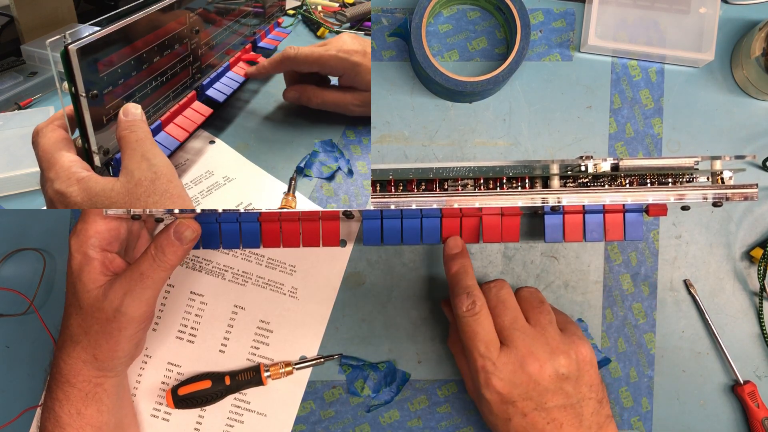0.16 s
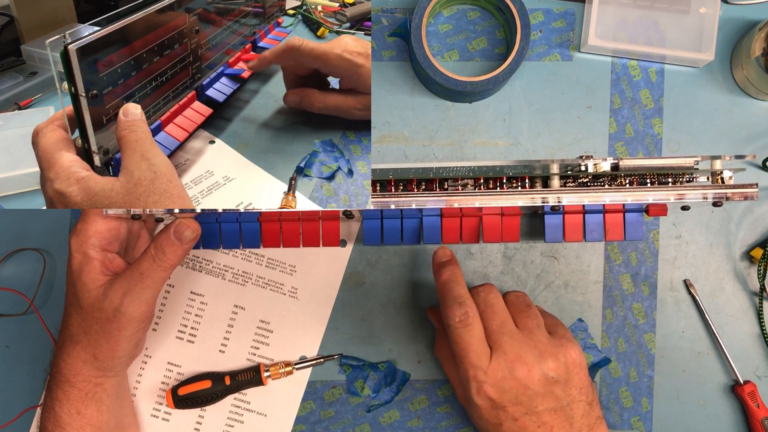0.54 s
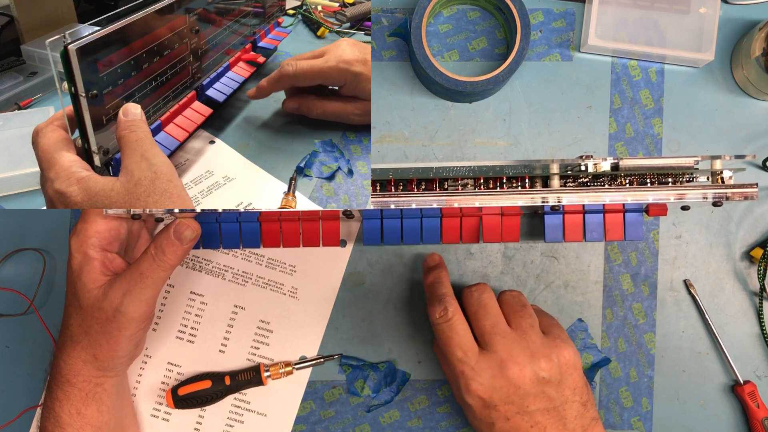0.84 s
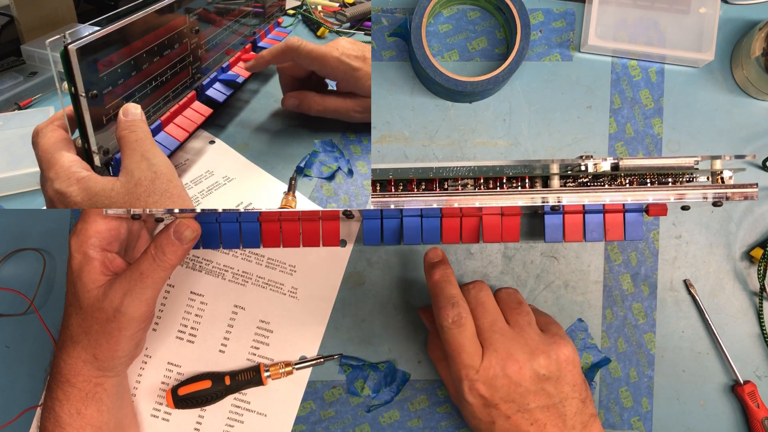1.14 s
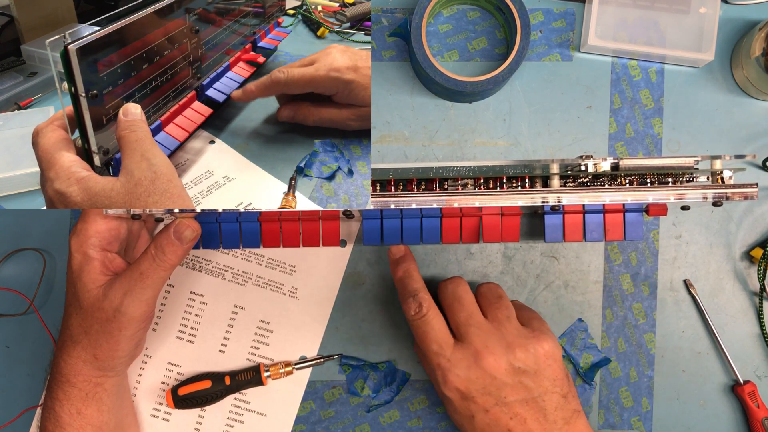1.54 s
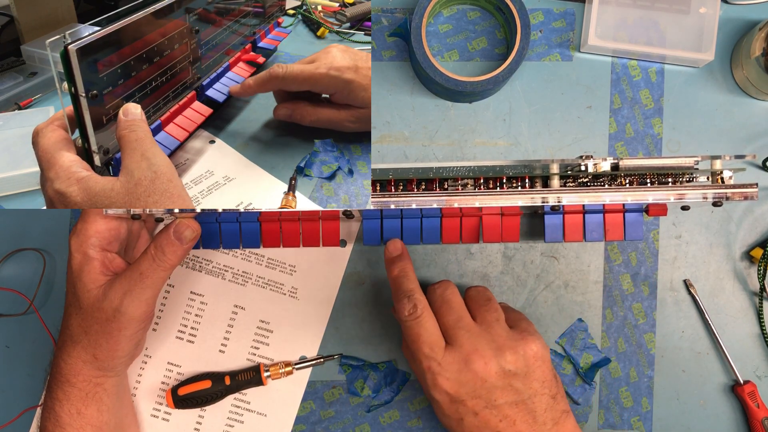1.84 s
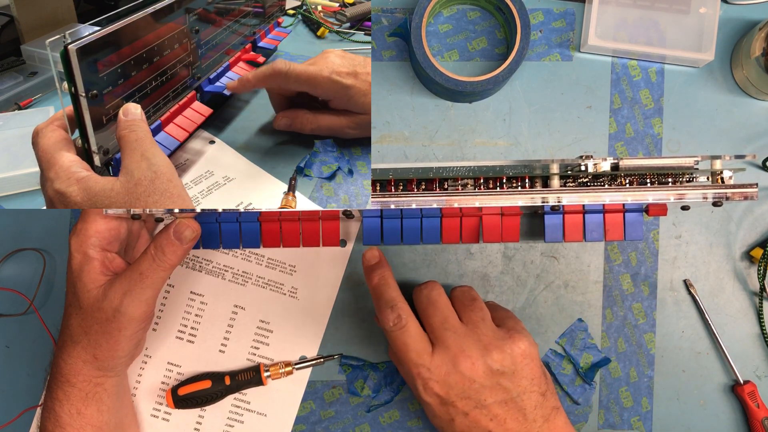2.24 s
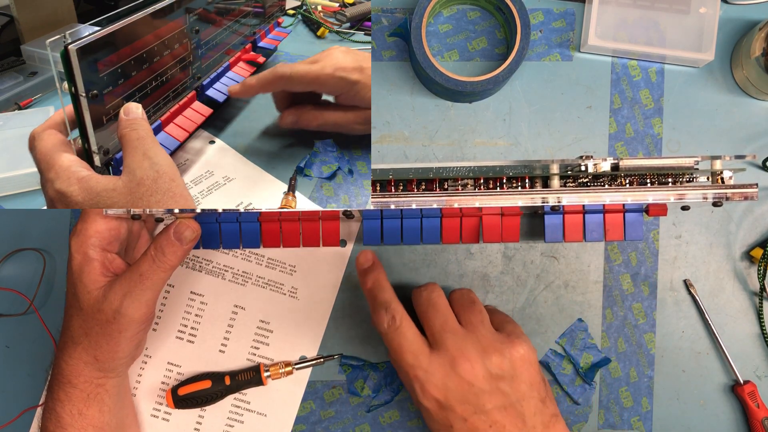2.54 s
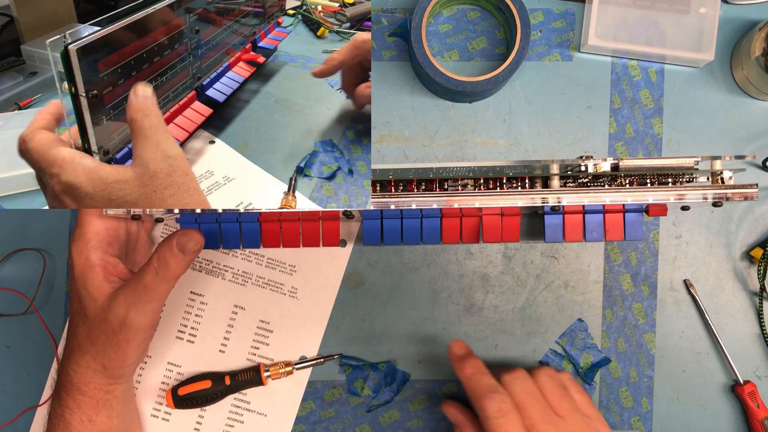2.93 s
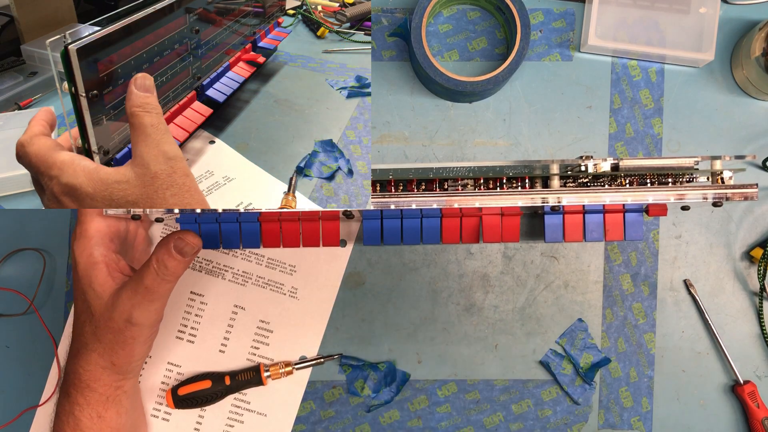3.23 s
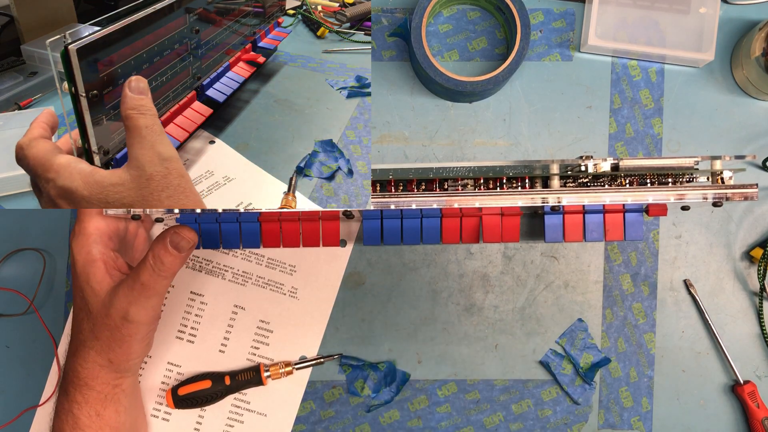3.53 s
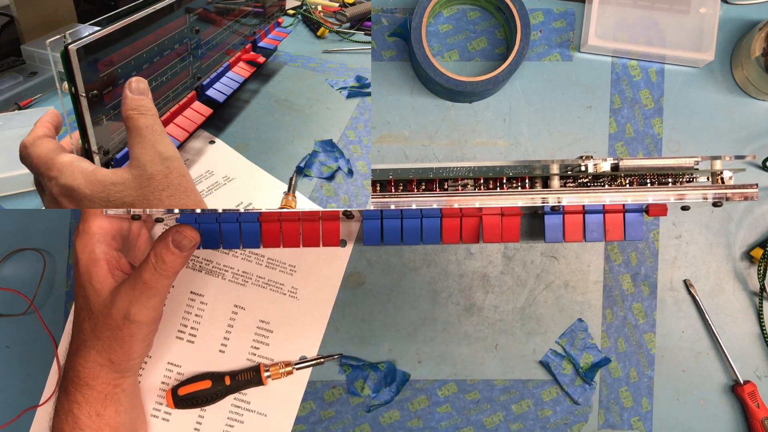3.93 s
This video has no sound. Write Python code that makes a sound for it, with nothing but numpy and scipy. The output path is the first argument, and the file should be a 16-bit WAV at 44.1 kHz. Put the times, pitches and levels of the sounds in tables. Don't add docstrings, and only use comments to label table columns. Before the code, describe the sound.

A close, dry indoor sound at a workbench over a quiet, low hum of air. Nine plastic paddle switches are flicked in turn, at about 0.18, 0.52, 0.77, 1.08, 1.36, 1.65, 1.90, 2.20 and 2.48 seconds. Each flick begins with a light fingertip tick, often slightly ahead, and a tiny scrape of the lever; then a bright metallic-plastic snap of the spring contact and, two to eight milliseconds later, a hard clack of the paddle on its stop. Hollow plastic resonance around one to two kilohertz and a soft low thump of the held board lie underneath. Pitches and strengths vary a little; a faint springy ring and a short small-room tail fade quickly. After 2.5 seconds the clicking ends. The hum continues, with very faint skin and sleeve hiss, swelling into soft rustles from about 3.3 to 4 seconds and a faint bump near 3.64.

```python
import sys
import numpy as np
from scipy import signal
from scipy.io import wavfile
from scipy.ndimage import uniform_filter1d, minimum_filter1d

SR = 44100
rng = np.random.default_rng(int(sys.argv[2]) if len(sys.argv) > 2 else 0)


def int16_out(signal):
    q = np.round(np.clip(np.atleast_2d(signal).T, -1, 1) * 32767)
    wavfile.write(sys.argv[1], SR, q.astype(np.int16))


def nominal_scale(level):
    x = np.asarray(level, float) / 20
    return 10 ** x


N = 179707

# frequency in Hz, T60 in seconds.
ROOM_DECAY = [(300, 0.14), (1200, 0.13), (3000, 0.17), (7000, 0.17), (14000, 0.14)]
# start in seconds, nail tick in dB, finger weight in dB, paddle pitch in Hz.
FINGER_TOUCHES = [(0.1585, -35.5, -41.5, 1460), (.262, -53, -50, 1010), (0.269, -62, -54, 1010),
                  (0.454, -38.5, -37.5, 1420), (0.728, -57, -55, 1690), (0.7312, -53.5, -48.5, 1670),
                  (1.0323, -37, -41.5, 1960), (1.318, -58, -65, 1640), (1.3261, -50.5, -50, 1650),
                  (1.5988, -40.5, -47.5, 1120), (1.857, -62, -64, 1530), (2.1526, -36, -43.5, 1680),
                  (2.4535, -50.5, -62, 1620)]


def evened(x):
    return x / np.sqrt(np.mean(x ** 2) + 1e-20)


def read(points, hz):
    f, value = np.transpose(points)
    return np.interp(np.log(hz + 1), np.log(f + 1), value)


def add(mix, s, sound):
    part = mix[round(s * SR):][:len(sound)]
    part += sound[:len(part)]


def coloured(points, size, patchy_db, flicker_db):
    frames = N * 4 // size + 8
    hz = np.fft.rfftfreq(size, 1 / SR)
    a, b, patches = rng.standard_normal((frames, len(hz), 3)).T
    patches = uniform_filter1d(patches, size=12, axis=0)
    patches = evened(uniform_filter1d(patches, size=8, axis=1))
    flicker = evened(uniform_filter1d(rng.standard_normal(frames), size=3))
    level_db = read(points, hz)[:, None] + patchy_db * patches + flicker_db * flicker
    noise = signal.istft((a + 1j * b) * nominal_scale(level_db), nperseg=size, noverlap=size * 3 // 4)[1]
    return evened(noise[:N])


def ring(modes, chance):
    spread_db, detune = 2, 0.01
    t = np.arange(round(0.3 * SR)) / SR
    out = np.zeros(len(t))
    for k, ((hz, db, t60), (a, b)) in enumerate(zip(modes, chance)):
        decay = nominal_scale(db + spread_db * a - 60 * t / t60)
        out += (-1) ** k * decay * np.sin(2 * np.pi * hz * (1 + detune * b) * t)
    return out


def near(modes, centre_hz, db_per_octave):
    return [(hz, db - db_per_octave * abs(np.log2(hz / centre_hz)), t60) for hz, db, t60 in modes]


def air():
    # frequency in Hz, density in dB per Hz.
    air_colour = [(56, -27.5), (95, 0.5), (152, 1.5), (177, -9), (303, -2.5), (359, -12), (408, -4),
                  (455, -15.5), (655, -12.5), (963, -13.5), (1450, -17.5), (1850, -29.5), (7550, -37.5),
                  (10600, -37.5), (16000, -41)]
    return nominal_scale(-54.5) * coloured(air_colour, size=2048, patchy_db=1.23, flicker_db=0.5)


def rumble():
    # frequency in Hz, density in dB per Hz.
    rumble_colour = [(2.4, -24.5), (4.0, 6.5), (17, -7.5), (38, -21.5), (59, -9), (75, -33), (100, -23),
                     (130, -46), (220, -120)]
    return nominal_scale(-40.5) * coloured(rumble_colour, size=8192, patchy_db=-0.5, flicker_db=0.0)


def sleeve():
    # frequency in Hz, density in dB per Hz.
    cloth = [(350, -61), (600, -15), (800, 1.5), (970, -20.5), (1100, -22), (1440, -10), (3980, -14.5),
             (10100, -10), (13900, -14.5), (15900, -19)]
    folds = [(500, -34), (800, -0.5), (1300, -12), (2000, -11.5), (2460, -5.5), (3000, -10.5), (4300, -15),
             (7000, -18)]
    # middle in seconds, length in seconds, level in dB, heavy folds in dB.
    strokes = [(.022, 0.063, -67, 2), (0.265, 0.032, -57.5, -1), (0.4, 0.054, -67, -14),
               (1.535, 0.044, -68.5, -11.5), (1.591, 0.035, -65.5, -9), (2.87, 0.68, -68, -38),
               (3.346, 0.23, -61, -5), (3.46, 0.19, -55.5, -29), (3.65, 0.23, -56, -18),
               (3.787, 0.12, -55, -5.5), (3.883, 0.22, -59.5, -19), (4.03, 0.31, -53.5, -1)]
    stroke_end_db = -12
    t = np.arange(N) / SR
    middle, length, db, folds_db = np.transpose(strokes)[:, :, None]
    power = nominal_scale(db + stroke_end_db * (2 * (t - middle) / length) ** 2) ** 2
    hiss_level = np.sqrt(power.sum(axis=0))
    rub_level = np.sqrt((power * nominal_scale(folds_db) ** 2).sum(axis=0))
    hiss = hiss_level * coloured(cloth, size=256, patchy_db=1.5, flicker_db=0)
    rub = rub_level * coloured(folds, size=512, patchy_db=2.5, flicker_db=-0.5)
    return hiss + rub


def creep():
    # frequency in Hz, level in dB, T60 in seconds.
    cam = [(3900, 5, 0.0024), (5020, -1.5, 0.004), (6460, -1, 0.0043), (8500, -0.5, 0.0023),
           (12000, 1, .0012)]
    # let-go in seconds, drag in dB, last slip in dB.
    presses = [
        (0.181, -52, -43),
        (.5215, -51.5, -48),
        (0.773, -59.5, -49),
        (1.077, -58, -37),
        (1.3538, -62, -47),
        (1.651, -52.5, -44),
        (1.898, -59, -42),
        (2.197, -58, -45),
        (2.478, -62, -59),
    ]
    creep_s, slip_s = 0.03, 0.003
    drag_s = creep_s - slip_s
    level = np.zeros(N)
    t = np.arange(0, creep_s, 1 / SR)
    for s, drag_db, slip_db in presses:
        db = np.interp(t, [drag_s, creep_s], [drag_db, slip_db])
        add(level, s - creep_s, nominal_scale(db) * np.minimum(t / drag_s, 1))
    slips = rng.standard_normal(N) * nominal_scale(2.9 * rng.exponential(1, N))
    cam_ring = ring(cam, np.zeros((len(cam), 2)))[:600]
    return level * evened(signal.oaconvolve(slips, cam_ring)[:N])


def impacts():
    # start in seconds, crack in dB, crack pitch in Hz, housing in dB.
    snaps = [(0.1793, -20.5, 11800, -29), (0.5212, -38.5, 8000, -33.5), (0.5245, -23.5, 7800, -45),
             (.7734, -27, 12800, -38), (1.078, -30, 12110, -40), (1.0809, -21.5, 8300, -31.5),
             (1.3535, -39, 8820, -49), (1.356, -31, 9100, -37.5), (1.6501, -39, 7250, -45),
             (1.6541, -38, 8450, -34), (1.6567, -34, 8900, -33.5), (1.898, -35, 12110, -34),
             (1.9003, -19.5, 12000, -41), (2.195, -31, 10000, -45), (2.1978, -19.5, 9700, -28.5),
             (2.4786, -33.5, 11400, -38)]
    # start in seconds, crack in dB, crack pitch in Hz, blow in dB, paddle pitch in Hz.
    slams = [(.1816, -21, 10200, -27.5, 1160), (0.5287, -25, 10900, -31.5, 1634),
             (.7771, -24, 11800, -26.5, 1585), (1.086, -21.5, 6670, -28, 1740),
             (1.359, -21.5, 11800, -28, 1180), (1.3607, -45, 8100, -35, 1370),
             (1.6589, -25.5, 7200, -35, 1740), (1.903, -30.5, 10300, -28.5, 1255),
             (2.2033, -24.5, 8350, -35, 1620), (2.481, -26.5, 12500, -29.5, 1370),
             (2.4845, -23, 11100, -27, 1150)]
    touch_hz, touch_housing_db, snap_paddle_db, slam_housing_db = 7100, -2.5, -6, 1.5
    rows = []
    for s, db, weight_db, paddle_hz in FINGER_TOUCHES:
        rows.append((s, db, touch_hz, db + touch_housing_db, weight_db, paddle_hz))
    for s, db, hz, housing_db in snaps:
        paddle_hz = min(slams, key=lambda slam: abs(slam[0] - s))[-1]
        rows.append((s, db, hz, housing_db, housing_db + snap_paddle_db, paddle_hz))
    for s, db, hz, blow_db, paddle_hz in slams:
        rows.append((s, db, hz, blow_db + slam_housing_db, blow_db, paddle_hz))
    return rows


def chatter(chance, rise_s, fade_s, share, first_db):
    when, size = chance
    t = np.arange(1, len(size) + 1) / SR
    swarm = size * (0.11 + (when < share)) * (1 - np.exp(-t / rise_s)) * np.exp(-t / fade_s)
    firm_blow = nominal_scale(first_db) * (np.arange(len(t)) == round(rise_s * SR))
    return swarm / np.linalg.norm(swarm) + firm_blow


def strike(blows, modes, db, count):
    sound = signal.fftconvolve(blows, modes)
    return nominal_scale(db) * sound / np.sqrt(np.mean(sound[:count] ** 2))


def switches():
    # frequency in Hz, level in dB, T60 in seconds.
    contact_modes = [(5280, -11, 0.0026), (6750, -3.5, 0.0054), (7370, -2.5, 0.0019), (8140, -1.5, 0.0036),
                     (9540, -1, 0.0016), (11900, -2, 0.0027), (12790, -3.5, 0.0031), (14270, -1.5, 0.002),
                     (15860, -7.5, 0.00097)]
    spring_modes = [(3805, 3.5, 0.046), (4020, 3, 0.12), (5420, -7.5, 0.16), (6520, -1.5, 0.0706),
                    (7800, -2.5, 0.15), (8700, -9.5, 0.081), (9870, -15, 0.101), (11440, -6, 0.12)]
    housing_modes = [(2480, -3.5, 0.0049), (2830, -2.5, 0.0034), (3680, -6, 0.011), (4070, -4.5, 0.0037),
                     (4610, -2.5, 0.0051)]
    paddle_modes = [(767, -12, 0.069), (1010, -3, 0.026), (1180, -13, 0.13), (1350, 1.5, 0.015),
                    (1302, -17, 0.2), (1429, -20.5, 0.26), (1460, -8.5, 0.088), (1686, -2, 0.048),
                    (1780, -11, 0.05), (1960, -1.5, 0.022), (2115, -12, 0.1), (2580, -5.5, 0.0088)]
    spring_db = -23
    treble, body = np.zeros((2, N))
    rows = impacts()
    chance = rng.standard_normal((len(rows), 4, 13, 2))
    rebounds = rng.random((len(rows), 2, 900))
    for row, c, (when, size) in zip(rows, chance, rebounds):
        s, crack_db, crack_hz, knock_db, paddle_db, paddle_hz = row
        signed = 2 * size - 1
        quick = chatter((when, signed), 0.00013, 0.0033, 0.24, first_db=-8.5)
        slow = chatter((when[::-1], signed[::-1]), 0.00093, 0.0021, 0.088, first_db=3)
        crack = ring(near(contact_modes, crack_hz, 8.1), c[0])[:800]
        housing = ring(housing_modes, c[1])[:800]
        paddle = ring(near(paddle_modes + [(paddle_hz, -1.5, 0.05)], paddle_hz, 9.1), c[2])
        spring = ring(near(spring_modes, crack_hz, 3.8), c[3])
        add(treble, s, strike(quick, crack, crack_db - 3.0, count=150))
        add(treble, s, strike(quick, spring, crack_db + spring_db, count=300))
        add(treble, s + 0.00032, strike(quick, housing, knock_db - 3.5, count=180))
        add(body, s + 0.00057, strike(slow, paddle, paddle_db - 2.5, count=350))
    return treble, body


def board():
    # frequency in Hz, level in dB, T60 in seconds.
    board_modes = [(143.9, -2, 0.13), (205, -9, 0.086), (339, -8.5, 0.057), (409.5, -2.5, 0.024),
                   (520, -3.5, 0.076)]
    sag_modes = [(49.8, -9, 0.31), (66.4, 11.5, 0.11), (93.2, 4, 0.13)]
    # start in seconds, knock in dB, knock pitch in Hz, sag in dB.
    jolts = [(.181, -31, 143.6, -41), (.533, -38, 144, -52), (.774, -32.5, 142, -40.5),
             (1.086, -32, 215, -39), (1.358, -30, 143.2, -39.5), (1.659, -30.5, 211, -45),
             (1.905, -36.5, 141.4, -36.5), (2.202, -38.5, 143, -41.5), (2.484, -35.5, 126.5, -35.5),
             (3.638, -44, 213, -67), (3.733, -73, 128, -61)]
    press_db, press_hz, press_sag_db = 1, 135, -6
    presses = [(s, db + press_db, press_hz, db + press_sag_db) for s, _, db, _ in FINGER_TOUCHES]
    rows = jolts + presses
    out = np.zeros(N)
    short_push = np.hanning(round(0.0019 * SR))
    slow_push = np.hanning(round(0.0072 * SR))
    chance = rng.standard_normal((len(rows), 2, 6, 2))
    for (s, knock_db, hz, sag_db), c in zip(rows, chance):
        knock_modes = near(board_modes, hz, 2.4) + [(hz, 1.5, 0.07)]
        knock = signal.fftconvolve(short_push, ring(knock_modes, c[0]))
        sag = signal.fftconvolve(slow_push, ring(sag_modes, c[1]))
        add(out, s + 0.00378, nominal_scale(knock_db + 2.7) * knock / np.abs(knock).max())
        add(out, s + 0.00303, nominal_scale(sag_db + 1.5) * sag / np.abs(sag).max())
    return out


def scatter(x):
    hz, t, z = signal.stft(x, SR, nperseg=256, noverlap=192)
    power = uniform_filter1d(abs(z) ** 2, size=11, axis=0)
    keep = nominal_scale(-120 * (t[1] - t[0]) / read(ROOM_DECAY, hz))
    power = np.array([signal.lfilter([1 - r], [1, -r], p) for r, p in zip(keep, power)])
    a, b = rng.standard_normal((len(t), len(hz), 2)).T
    tail = signal.istft((a + 1j * b) * np.sqrt(abs(power)), SR, nperseg=256, noverlap=192)[1]
    return np.concatenate([np.zeros(190), tail])[:N]


def room(x):
    taps = np.zeros(SR // 2)
    at = np.arange(88, len(taps) - 12, 12)
    taps[at + rng.integers(0, 12, len(at))] = rng.choice([-1., 1.], len(at))
    hz, t, z = signal.stft(taps, SR, nperseg=128)
    decay = nominal_scale(-60 * t / read(ROOM_DECAY, hz)[:, None])
    tail = signal.istft(z * decay, SR, nperseg=128)[1]
    return signal.fftconvolve(x, tail / np.linalg.norm(tail))[:N]


def scene():
    treble, body = switches()
    thumps = board()
    tail = nominal_scale(-6.0) * scatter(treble) + nominal_scale(-6) * scatter(body)
    tail += room(nominal_scale(-17.5) * treble + nominal_scale(-14.5) * body + nominal_scale(-10.0) * thumps)
    background = air() + rumble() + sleeve()
    return (treble + body + thumps + creep() + tail + background)[None]


def roll_off(x):
    return signal.sosfilt(signal.butter(12, 16960, fs=SR, output="sos"), x)


def record(dry):
    band_limit = signal.firwin(301, 15750, window=("kaiser", 8), fs=SR)
    x = signal.oaconvolve(dry, band_limit[None], "same")
    treble = x - signal.oaconvolve(x, signal.firwin(101, 3800, fs=SR)[None], "same")
    level_db = 10 * np.log10(abs(uniform_filter1d(treble[0] ** 2, size=64)) + 1e-12)
    coming_db = -minimum_filter1d(-level_db, size=520, origin=-259)
    attack_ahead = coming_db - level_db > 24
    not_falling = np.roll(level_db, -170) < level_db + 9
    starved = attack_ahead & not_falling & (level_db < -66)
    mix = x - treble * uniform_filter1d(starved * 1., size=60)
    return roll_off(mix)


dry = scene()
out = record(dry)
int16_out(out)
```